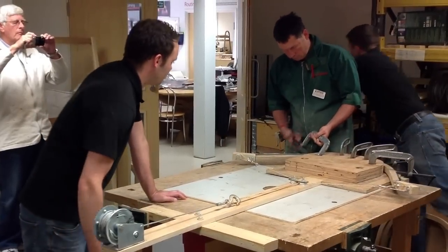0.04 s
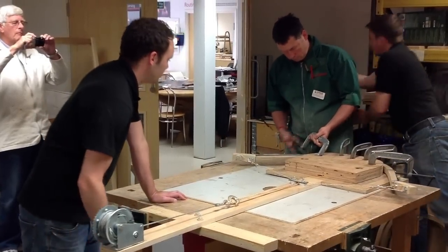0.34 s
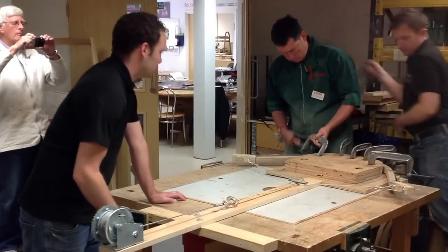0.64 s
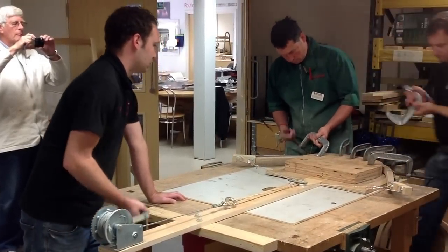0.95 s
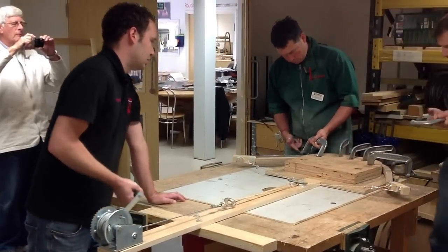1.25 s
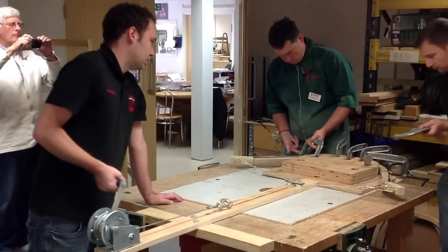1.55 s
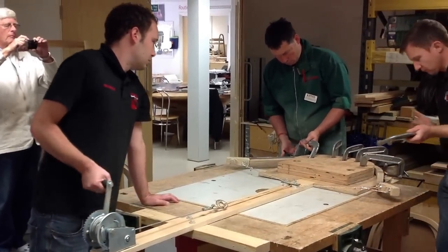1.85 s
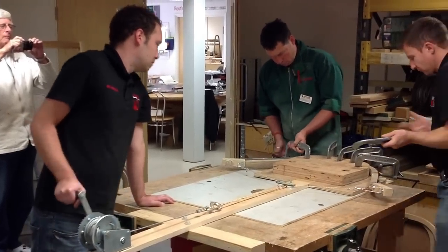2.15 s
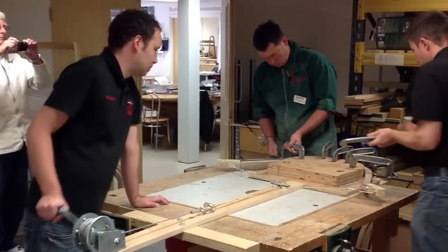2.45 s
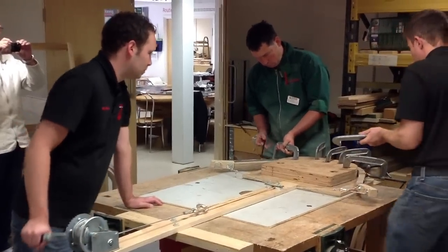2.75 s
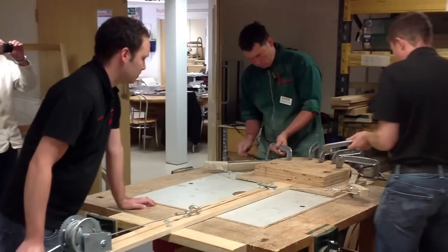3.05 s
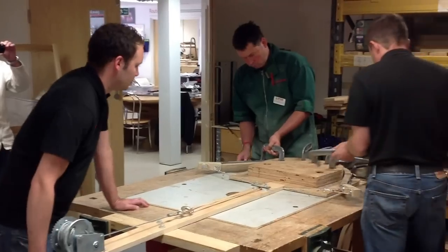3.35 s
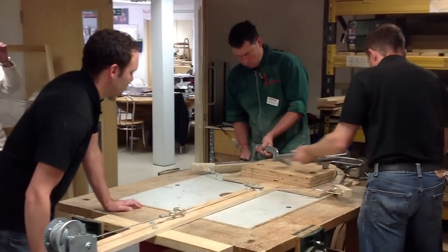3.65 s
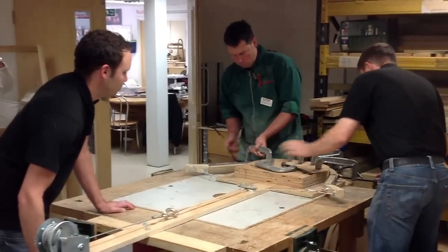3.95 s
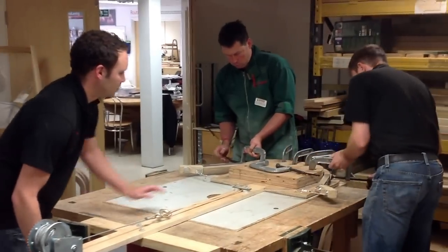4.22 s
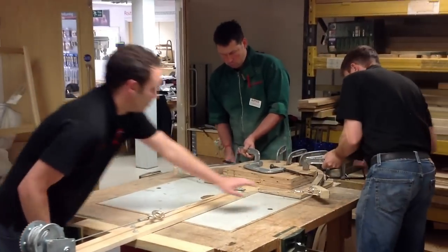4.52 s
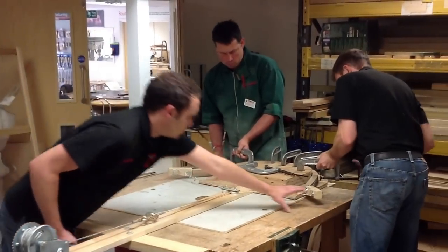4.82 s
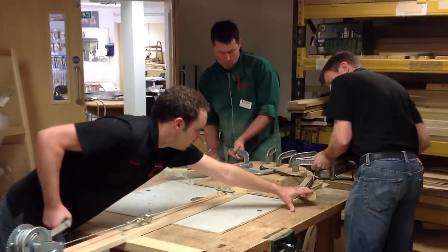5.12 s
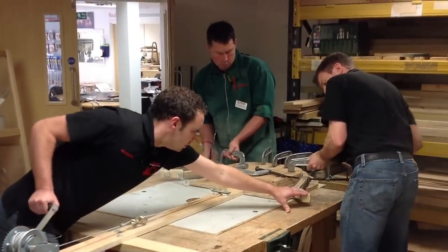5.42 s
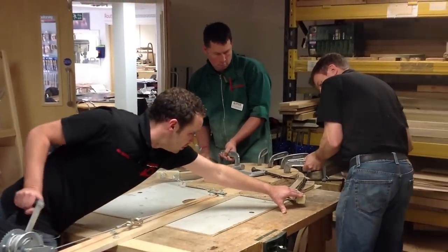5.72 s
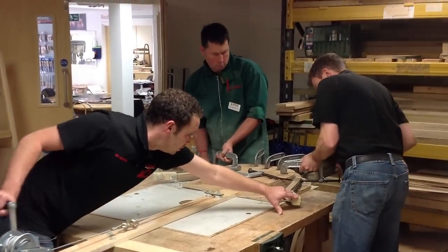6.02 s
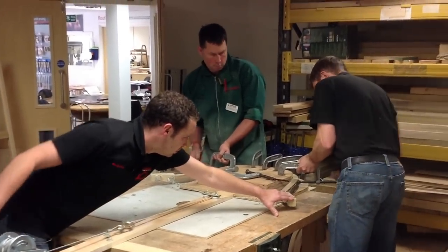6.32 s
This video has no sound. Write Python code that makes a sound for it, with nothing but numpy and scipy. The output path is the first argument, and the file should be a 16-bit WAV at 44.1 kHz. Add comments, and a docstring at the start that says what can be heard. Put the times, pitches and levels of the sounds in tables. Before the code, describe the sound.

Steel clamps clatter onto wooden boards right from the start, a quick jumble of booms, clacks and metallic ringing lasting to about 0.6 seconds. Loud clamp landings follow at 1.1 and 2.1 seconds, a faint one at 3.3, and a last clatter around 4.1. Loose screw handles clink between them, mostly from 1 to 2 seconds and from 4 to 4.6, and wood knocks lightly on the bench here and there.

From 0.7 seconds a hand winch is cranked slowly. Its catch snaps onto the steel teeth in sharp, ringing clicks about three times a second, sometimes with a faint squeaky scrape first. The clicks pause between 1.8 and 2.6 seconds, then continue to the end at about 6.3. After 4.7 seconds mainly these clicks and a few soft knocks remain. The small workshop gives everything a short echo over faint, steady ventilation hiss.

```python
"""Steel clamps clatter onto boards in a woodwork shop: the wood booms and clacks, the steel rings.
More clamps are pulled from a pile and set on the bench, with light knocks and clinking screw handles.
Meanwhile a hand winch is cranked slowly to bend a strip of wood: its pawl, the catch that stops it
unwinding, scrapes up the teeth and snaps down, one tooth at a time.
The small room gives the blows a short echo over faint ventilation."""
import sys
import numpy as np
from scipy import signal
from scipy.fft import rfft, irfft
from scipy.io import wavfile

SR = 44100
rng = np.random.default_rng(int(sys.argv[2]) if len(sys.argv) > 2 else 0)


def transcribe(u):
    """Save the signal u as a 16-bit wav file named by the first command-line argument.

    u: samples, shape (n,) or (channels, n), limited to [-1, 1]; the rate is SR.
    q: integer samples, one column per channel.
    """
    v = np.clip(np.atleast_2d(u).T, -1, 1)
    q = np.round(v * 32767).astype(np.int16)
    wavfile.write(sys.argv[1], SR, q)


N = 280917
AGE = np.arange(32768) / SR  # seconds since a blow
FREQ = np.maximum(np.fft.rfftfreq(len(AGE), 1 / SR), 1)  # the pitches in a blow, in Hz

# tone of the wooden boards: pitch_hz, level_db
WOOD_TONE = [(30, -70), (70, -28), (95, -31.5), (130, -11.5), (200, -6), (380, -9), (500, -8.5),
             (630, -3.5), (800, -4), (1300, -7), (2000, -9), (3000, -33)]
# tone of the clamp steel: pitch_hz, level_db
STEEL_TONE = [(1500, -5.5), (2300, -2.5), (2700, -1.5), (3700, -3), (4500, -6.5), (5400, -7), (6000, -8.5),
              (7200, -5.5), (7700, -12), (8400, -6), (10000, -18), (12300, -6.5), (13500, -14.5),
              (15500, -46)]


def undb(db):
    """Turn decibels into a gain."""
    return 10 ** (np.asarray(db) / 20)


def unit(x):
    """Scale a sound to an average (rms) level of 1."""
    return x / np.sqrt(np.mean(x ** 2))


def along(points, hz):
    """Read between the (pitch_hz, value) points of a curve, with octaves evenly spaced."""
    pitches, values = np.transpose(points)
    return np.interp(np.log(hz), np.log(pitches), values)


def fade(fade_s):
    """Die away by 60 dB in fade_s seconds."""
    return np.exp(-np.log(1000) * AGE / max(fade_s, 1e-3))


def swell(rise_s):
    """Vibration builds up while the contact lasts."""
    return 1 - np.exp(-AGE / max(rise_s, 1e-5))


def band(low_hz, high_hz):
    """A tone curve that keeps the pitches between two limits."""
    return 1 / np.sqrt((1 + (low_hz / FREQ) ** 10) * (1 + (FREQ / high_hz) ** 10))


def through(x, tone):
    """Filter a blow with a tone curve."""
    taps = np.roll(irfft(tone), 64)[:129] * np.hanning(129)
    return signal.fftconvolve(x, taps, mode="same")


def cloud(tone):
    """Countless vibrations blur into steady noise with the given tone."""
    return unit(irfft(tone * np.exp(2j * np.pi * rng.random(len(FREQ)))))


def burst(tone, fade_s, rise_s):
    """A short, noisy ring whose pitches arrive scattered over the fade."""
    phase = np.angle(rfft(rng.standard_normal(len(AGE)) * fade(fade_s) * swell(rise_s)))
    return irfft(tone * np.exp(1j * phase)) * swell(rise_s / 2) * fade(0.42)


def ringing(notes, detune):
    """A struck object's own notes: fading sine waves, each randomly a little off pitch by detune."""
    return sum(undb(db) * np.sin(2 * np.pi * hz * (1 + detune * rng.standard_normal()) * AGE)
               * fade(fade_s) for hz, db, fade_s in notes)


def chatter(per_second, fade_s):
    """Uneven little contacts after a first firm one, dying away."""
    contacts = (rng.random(len(AGE)) < per_second / SR) * rng.standard_normal(len(AGE)) * fade(fade_s)
    contacts[0] += 1
    return contacts


def excite(pushes, response):
    """Every push sets off its own copy of the response."""
    return signal.fftconvolve(pushes, response)[:len(AGE)]


def heard(x, room, db, echo_db):
    """A blow plus its room echo, set to level db over the first 30 ms."""
    blow = x + undb(echo_db) * excite(x, room)
    return blow * undb(db) / np.sqrt(np.mean(blow[:int(.03 * SR)] ** 2))


def add(out, start_s, x):
    """Mix a sound in at start_s."""
    i = max(int(start_s * SR), 0)
    out[i:i + len(x)] += x[:N - i]


def ventilation():
    """Moving air makes a soft, steady hiss."""
    # tone of the air: pitch_hz, level_db
    air_tone = [(18, -53.5), (30, -42), (120, -3), (561, -6), (673, -5.5), (970, -6.5), (1230, -2.5),
                (3070, -3.5), (3400, -5.5), (3980, -9), (5310, -6.5), (7860, -15), (15500, -21.5)]
    hz = np.maximum(np.fft.rfftfreq(N, 1 / SR), 1)
    hiss = irfft(rfft(rng.standard_normal(N)) * undb(along(air_tone, hz)), N)
    return undb(-51.5) * unit(hiss)


def room_echo():
    """A smooth echo in which low pitches last longest, and a faint answer from the next room."""
    # how long the room rings: pitch_hz, fade_s
    fade_times = [(150, 0.57), (300, 0.46), (600, 0.26), (1500, 0.22), (4000, 0.25), (8000, 0.26),
                  (15000, 0.19)]
    tail = sum(np.sqrt(hz) * cloud(band(hz / np.sqrt(2), hz * np.sqrt(2))) * fade(along(fade_times, hz))
               for hz in 62.5 * 2 ** np.arange(9))  # octave by octave
    next_room = undb(-24.5) * unit(cloud(band(100, 6000)) * fade(0.72))
    return (unit(tail * swell(0.00054)) + next_room) / np.sqrt(len(AGE))


def clack(room, db, length_s):
    """The middle pitches of a blow on wood; a glancing blow builds more slowly and lasts longer."""
    wood = burst(undb(along(WOOD_TONE, FREQ)) * band(436, 1650), 1.14 * length_s, 0.022 * length_s)
    return heard(wood, room, db, echo_db=1.5)


def knock(room, db, hardness_db):
    """Wood is nudged against the bench: a harder contact gives more sharp edge and less thump."""
    ring_s = 0.22
    edge = cloud(band(1550, 15000) / FREQ) * fade(ring_s)
    thump = cloud(band(217, 335)) * fade(ring_s) * swell(0.01)
    return (heard(thump, room, db - hardness_db, echo_db=-3.0)
            + clack(room, db - 2.5, ring_s)
            + heard(edge, room, db + hardness_db, echo_db=1.0))


def clink(room, db):
    """A loose handle rattles in its screw: dry ticks and clusters of high notes."""
    # notes of the handle: pitch_hz, level_db, fade_s
    handle_notes = [(5160, -2.5, 0.33), (8400, -3, 0.23), (12100, -5, .22)]
    ring = sum(ringing(handle_notes, detune=.022) for _ in range(8))
    tick = cloud(undb(along(STEEL_TONE, FREQ)) * band(1600, 15500)) * fade(0.16)
    rattle = excite(chatter(per_second=230, fade_s=0.27), unit(ring) + undb(-2.0) * unit(tick))
    return heard(rattle, room, db, echo_db=-8.5)


def pawl_rub(room, length_s, db):
    """The pawl sticks and slips up a steel tooth, scraping with one squeaky note."""
    slips = (rng.random(len(AGE)) < 900 / SR) * rng.standard_normal(len(AGE)) * (AGE < length_s)
    squeak = unit(ringing([(1426, 0, 0.014)], detune=0.047) * swell(.001))
    scrape = undb(4.0) * unit(cloud(band(1250, 13500) / FREQ) * fade(0.042))
    return heard(excite(slips, squeak + scrape), room, db, echo_db=0.5)


def pawl_drop(room, frame_db, tooth_hz):
    """The pawl snaps onto a tooth: tooth, frame and drum ring, and the bench answers faintly."""
    # notes of the winch frame: pitch_hz, width_hz, level_db
    frame_notes = [(782, 59, -6.5), (1046, 29, 4), (1687, 65, 8.5), (2150, 490, 10.5), (5540, 310, -3),
                   (6220, 210, 2), (7100, 205, 3), (9040, 660, -2.5), (11600, 300, -13)]
    # tone of the gear and drum: pitch_hz, level_db
    winch_tone = [(250, -22), (500, -19.5), (750, -19), (1050, -15), (1350, -6.5), (1750, 9), (2300, -8),
                  (3000, -1), (3700, -1.5), (4800, -7), (7000, -6), (10000, -8.5), (13400, -2.5),
                  (15500, -13.5)]
    # lingering notes of the drum: pitch_hz, level_db, fade_s
    drum_notes = [(1705, -34, 0.19), (2320, -36.5, 0.41), (5553, -44.5, 0.56), (5980, -43.5, 0.52)]
    snap_db, body_db = -19.5, -31  # the spring throws the pawl equally hard every time
    notes = list(frame_notes) + [(tooth_hz, 240, 6)]
    peaks = sum(undb(db + 3.5 * rng.standard_normal()) ** 2 / (1 + (2 * (FREQ - hz) / width_hz) ** 2)
                for hz, width_hz, db in notes)
    tone = np.sqrt(undb(along(winch_tone, FREQ)) ** 2 + undb(-1.5) * peaks)
    body = burst(tone * band(560, 1160), fade_s=0.11, rise_s=0.0025)
    frame = burst(tone * band(1100, 2190), fade_s=0.059, rise_s=0.012)
    snap = burst(tone * band(2760, 12300), fade_s=0.1, rise_s=0.00091)
    steel = sum(heard(x, room, db, echo_db=2.0)
                for x, db in ((body, body_db), (frame, frame_db), (snap, snap_db)))
    bench = undb(body_db - 13.0) * cloud(band(179, 363)) * swell(0.022) * fade(0.66)
    drum = ringing(drum_notes, detune=0.00067) * swell(0.0048)
    return steel + drum + bench


def boards(room, notes, db, low_hz, high_hz):
    """Struck boards ring in a few low notes, and the whole bench rumbles along."""
    # the boards' ring is cut below 135 Hz, leaving little deep rumble under their lowest note
    low_cut = signal.butter(4, 135, "high", fs=SR, output="sos")
    body = signal.sosfilt(low_cut, ringing(notes, detune=0.021) * swell(0.0067))
    rumble = cloud(undb(along(WOOD_TONE, FREQ)) * band(low_hz, high_hz)) * fade(0.28) * swell(0.0086)
    return heard(unit(body) + undb(-5.5) * unit(rumble), room, db, echo_db=-7.5)


def free_clamps():
    """Two clamps hang free and ring on after a blow, one in the pile and one on the bench."""
    # notes of each clamp: pitch_hz, level_db, fade_s
    pile_notes = [(1870, -15.5, 0.2), (3810, -27, 0.32), (5500, -27, 0.37), (7230, -17, 0.21),
                  (9243, -33, .26)]
    bench_notes = [(2630, -18, 0.42), (3160, -16.5, 0.42), (4570, -32, 0.6), (5260, -35, 0.67),
                   (6570, -34, .38), (8188, -26, 0.39), (12030, -26, 0.44)]
    return [ringing(notes, detune=0) * swell(0.0025) for notes in (pile_notes, bench_notes)]


def clamp(room, wood_db, steel_db, jingle_db, rattle_s):
    """A clamp lands on the boards and chatters: each contact cracks and keeps the steel ringing."""
    # notes that all the clamps roughly share: pitch_hz, level_db
    steel_notes = [(1890, 2.5), (2650, 7.5), (2900, -27), (3170, -0.5), (3850, 0), (4600, -4.5), (5230, 3),
                   (5530, 2.5), (6490, 4), (7200, -2), (8220, 1.5), (8430, 8), (9250, 1.5), (11720, 0),
                   (12100, -2), (12550, -1.5), (14700, -11)]
    # deep notes of the boards: pitch_hz, level_db, fade_s
    boom_notes = [(136, -21, 0.13), (182.8, 4.5, 0.13), (196, 0, 0.04)]
    # higher notes of the boards: pitch_hz, level_db, fade_s
    thump_notes = [(270, 2.5, 0.13), (346, 1.5, 0.12), (377.8, 0.5, 0.14), (436, -10.5, 0.3)]
    contacts = chatter(per_second=400, fade_s=rattle_s)
    crack_level = np.sqrt(np.abs(excite(contacts ** 2, fade(0.027) ** 2)))
    # it shakes a neighbour of slightly different size too; the spot that is hit favours some notes
    pair = sum(ringing([(hz, db + 3 * rng.standard_normal(), .07) for hz, db in steel_notes], 0.01)
               for _ in range(2))
    ring = undb(-4.5) * unit(excite(contacts, pair))
    cracks = unit(crack_level * cloud(undb(along(STEEL_TONE, FREQ))))
    steel = (cracks + ring) * swell(0.007 * rattle_s)
    frame = heard(through(steel, band(1410, 5530)), room, steel_db, echo_db=4.0)
    handle = heard(through(steel, band(6800, 15000)), room, jingle_db, echo_db=3.5)
    # a longer, softer landing booms more and clacks less; 0.18 s is typical
    softness = np.log2(max(rattle_s, .01) / 0.18)
    boom = boards(room, boom_notes, wood_db - 1.46 + 4.5 * softness, low_hz=60, high_hz=300)
    thump = boards(room, thump_notes, wood_db, low_hz=210, high_hz=536)
    return frame + handle + boom + thump + clack(room, wood_db - 2.5 - 3 * softness, rattle_s)


def scene():
    """Winch, clamps and knocks share one room, their echoes taking varied paths."""
    # wood knocks on the bench: start_s, level_db, hardness_db
    knocks = [(.82, -41, 7.5), (1.52, -55.5, 17), (2.029, -47, -0.5), (2.115, -41, -3), (2.412, -46.5, -8),
              (3.826, -31.5, 6), (4.024, -38.5, 6), (4.509, -41.5, 1), (4.622, -44.5, 3.5),
              (5.341, -47.5, 11), (5.685, -37.5, 6), (5.812, -52, 5.5), (6.059, -48, 6)]
    # a screw handle slides: start_s, level_db
    clinks = [(.92, -51), (1.17, -32), (1.348, -37), (1.96, -36.5), (2.968, -48), (3.953, -39.5),
              (4.335, -39), (4.622, -36), (6.059, -47.5)]
    # the pawl climbs a tooth: start_s, length_s, level_db
    rubs = [(.475, 0.031, -46), (1.003, 0.044, -43), (1.7, 0.089, -48.5), (2.545, 0.12, -40.5),
            (3.745, 0.078, -50), (4.33, 0.027, -40), (5.882, 0.018, -39), (6.188, 0.041, -49.5)]
    # the pawl drops: start_s, frame_db, tooth_hz
    drops = [(.7026, -19.5, 3000), (1.0396, -24, 2830), (1.3791, -23, 3270), (1.7535, -22.5, 3630),
             (2.6432, -29.5, 3530), (3.011, -25, 3730), (3.4235, -29, 3760), (3.8095, -23.5, 3050),
             (4.353, -26, 3700), (4.7355, -22.5, 2900), (5.111, -20.5, 2670), (5.4158, -22.5, 3420),
             (5.918, -19.5, 3640), (6.2405, -21.5, 3600)]
    # clamps land on the boards and each other: start_s, wood_db, steel_db, jingle_db, rattle_s
    landings = [(.001, -32.5, -29.5, -34.5, 0.092), (.038, -23.5, -25.5, -33, 0.5),
                (.113, -27, -19, -21.5, 0.11), (.157, -23.5, -25, -26.5, 0.53),
                (.2115, -24.5, -27, -28, 0.18), (.231, -21.5, -24.5, -29, 0.52),
                (.262, -20.5, -22, -25.5, 0.32), (.338, -20, -16, -23.5, 0.21),
                (.386, -24.5, -22.5, -22.5, 0.11), (.461, -25, -39, -50.5, 0.37),
                (.533, -19.5, -19, -27, 0.19), (1.122, -17, -19, -32, 0.14), (1.138, -15, -20, -31.5, 0.13),
                (1.212, -23, -30.5, -36, 0.3), (1.321, -37, -36.5, -43, 0.097),
                (1.348, -47, -36.5, -31, .07), (2.143, -14, -20.5, -28.5, 0.23),
                (2.177, -35, -21.5, -24, 0.17), (2.209, -26.5, -25, -30, 0.19),
                (2.279, -23.5, -32, -40, 0.18), (3.3445, -37, -46.5, -75, 0.031),
                (3.951, -41, -31, -33.5, 0.17), (4.0712, -20, -18, -27, 0.028),
                (4.09, -25, -22, -24.5, 0.065), (4.171, -28.5, -28, -32, 0.22)]
    echoes = [room_echo() for _ in range(14)]
    out = ventilation()
    layers = (drops, pawl_drop), (rubs, pawl_rub), (landings, clamp), (clinks, clink), (knocks, knock)
    for events, source in layers:
        for k, (start_s, *settings) in enumerate(events):
            add(out, start_s, source(echoes[k % len(echoes)], *settings))
    pile_ring, bench_ring = free_clamps()
    add(out, .262, undb(-7) * pile_ring)
    add(out, .534, pile_ring)
    add(out, 4.089, bench_ring)
    add(out, 4.514, undb(-26) * bench_ring)
    return out[None]


def record(dry):
    """The microphone rounds the loudest peaks, and the treble above 15600 Hz is cut."""
    rounded = dry / (1 + (dry / .95) ** 4) ** .25
    return signal.sosfilt(signal.ellip(10, .2, 80, 15600, fs=SR, output="sos"), rounded)


dry = scene()
out = record(dry)
transcribe(out)
```